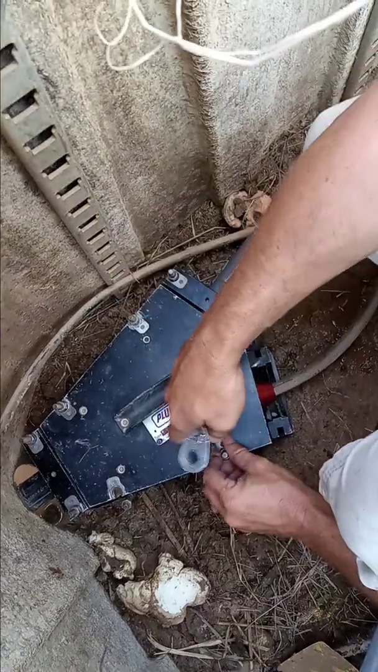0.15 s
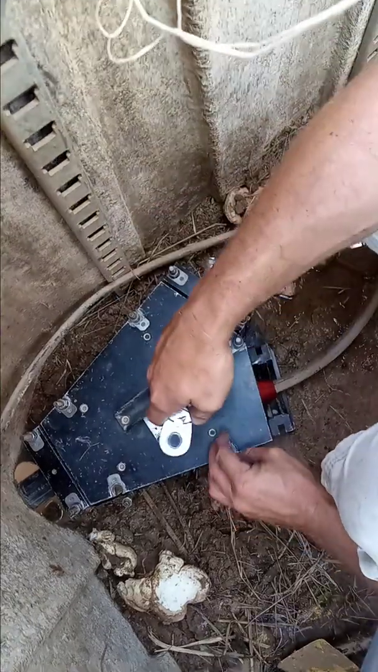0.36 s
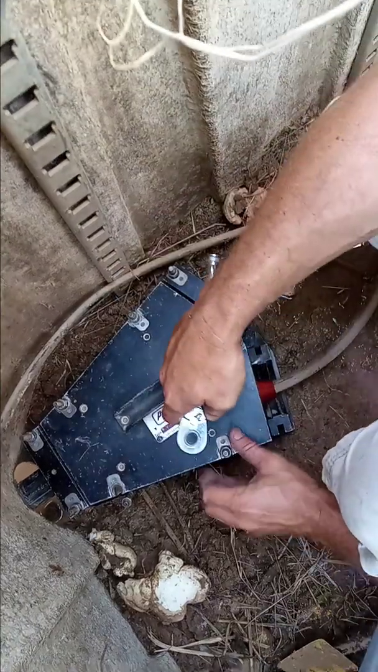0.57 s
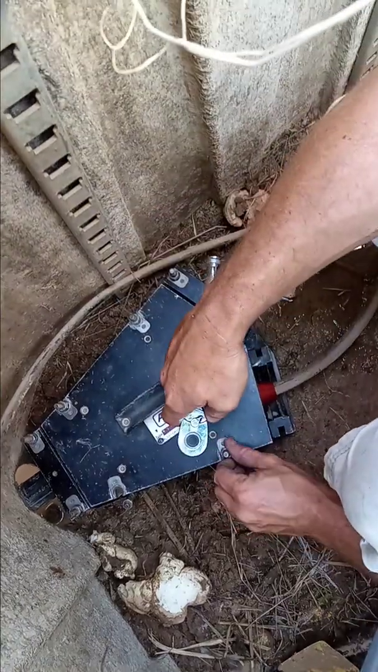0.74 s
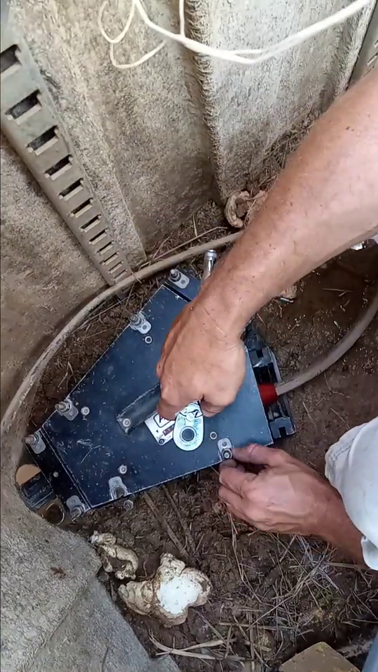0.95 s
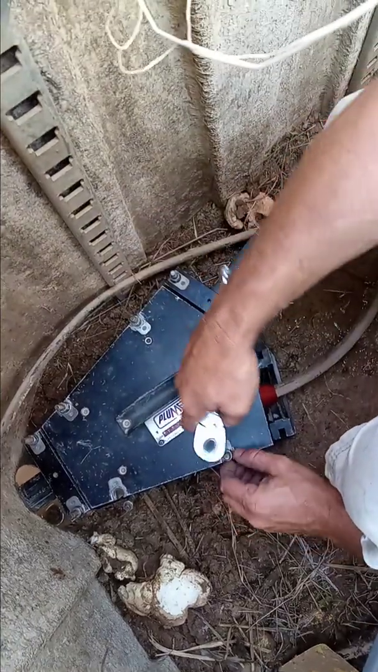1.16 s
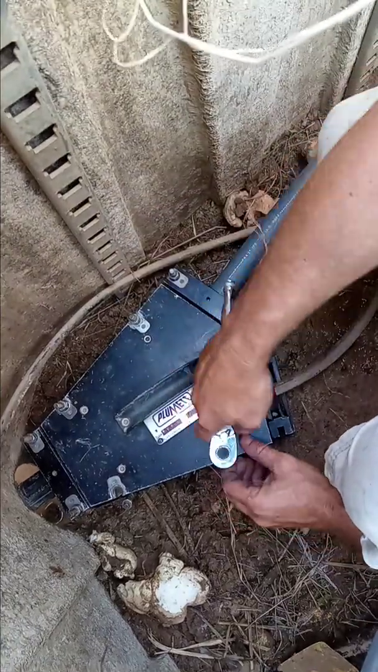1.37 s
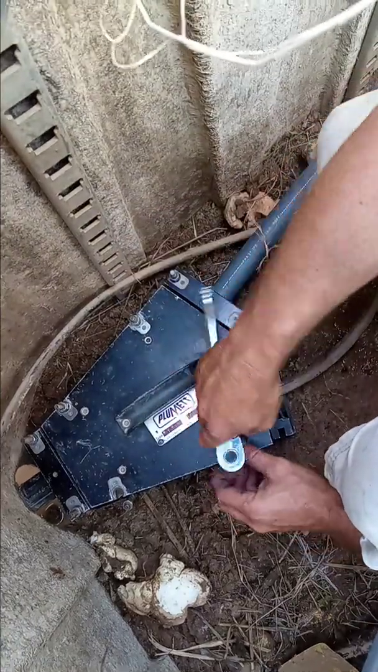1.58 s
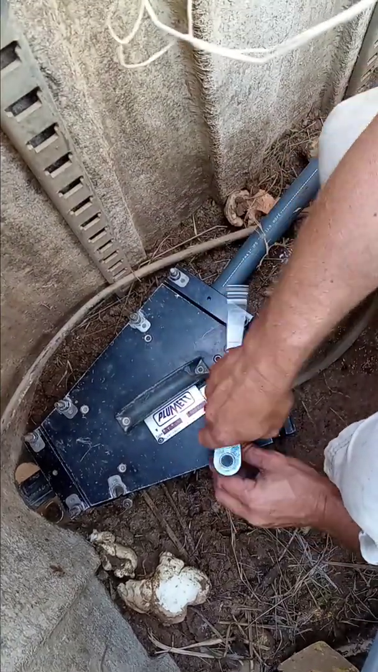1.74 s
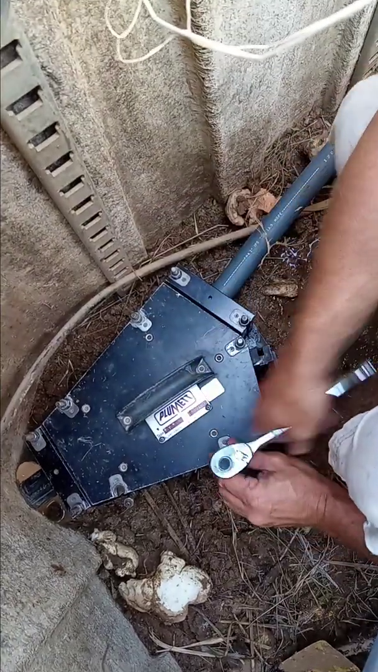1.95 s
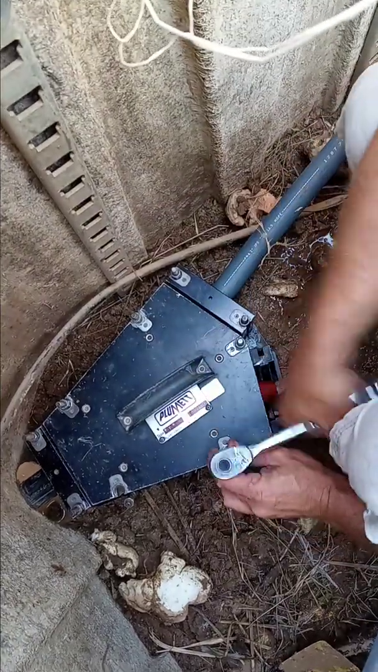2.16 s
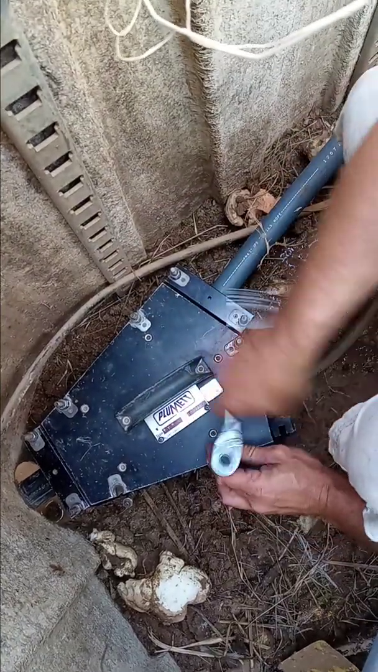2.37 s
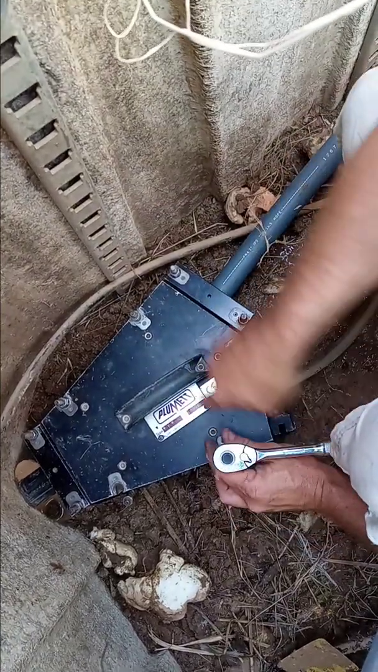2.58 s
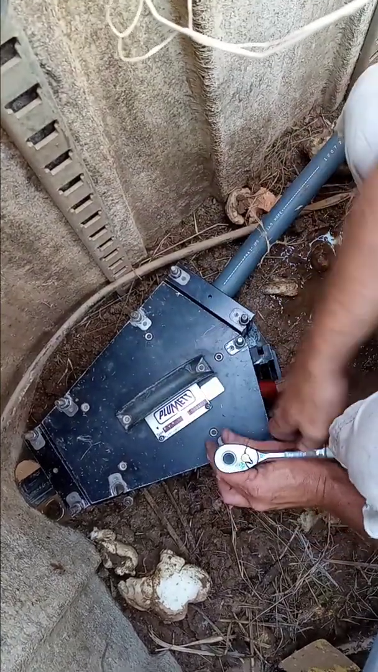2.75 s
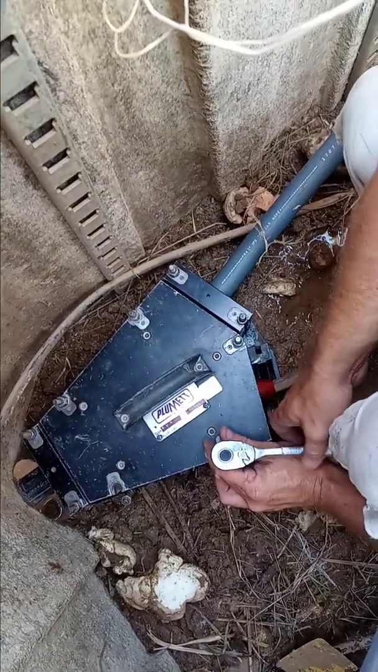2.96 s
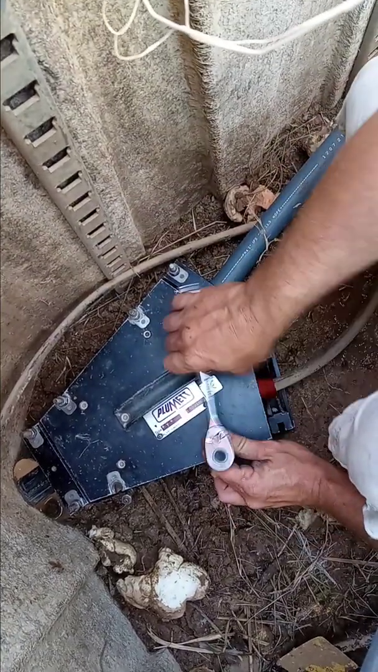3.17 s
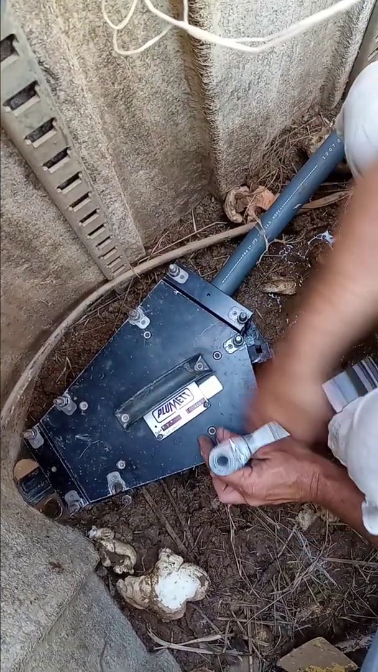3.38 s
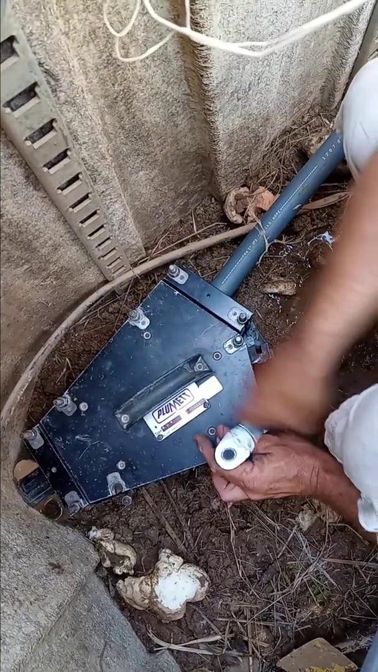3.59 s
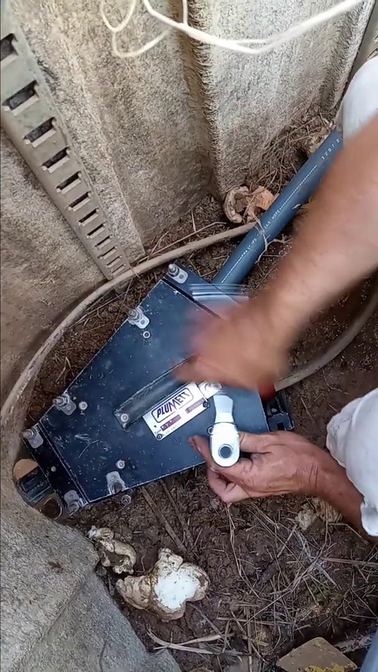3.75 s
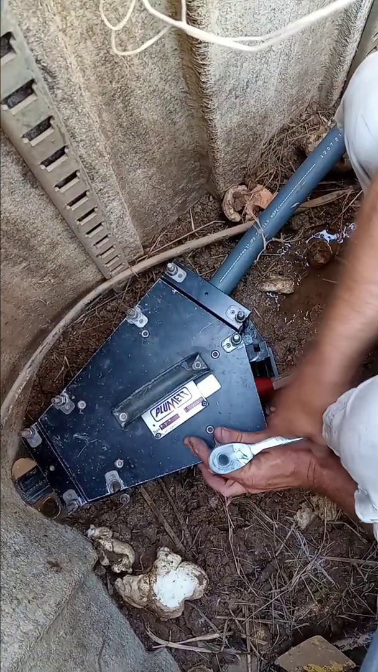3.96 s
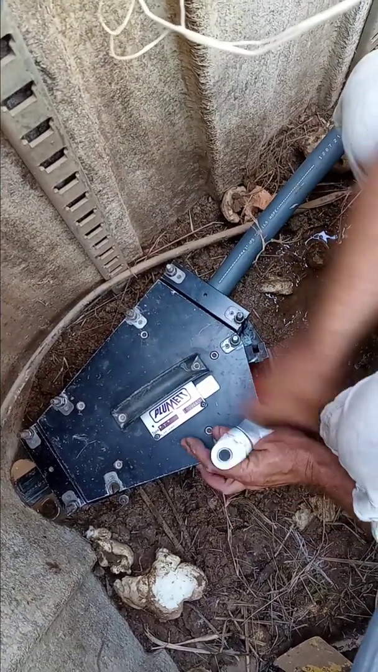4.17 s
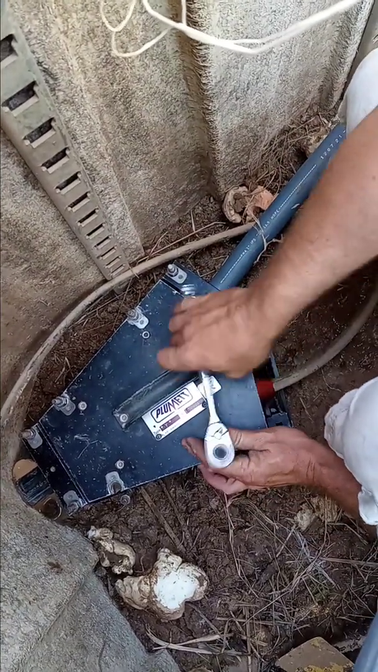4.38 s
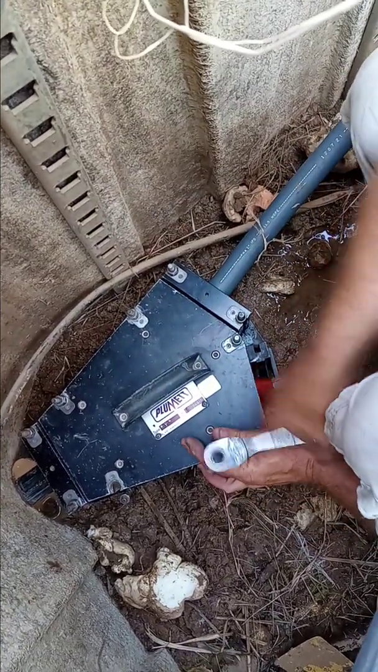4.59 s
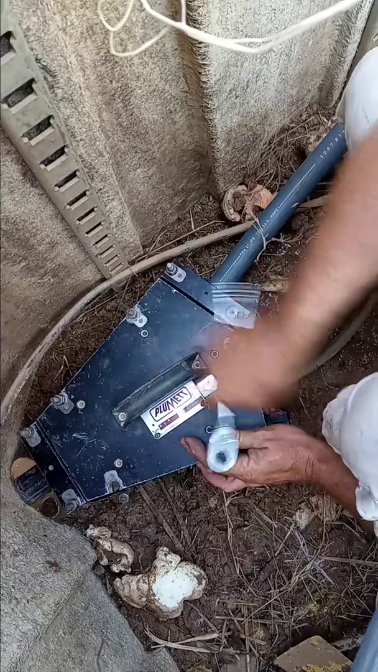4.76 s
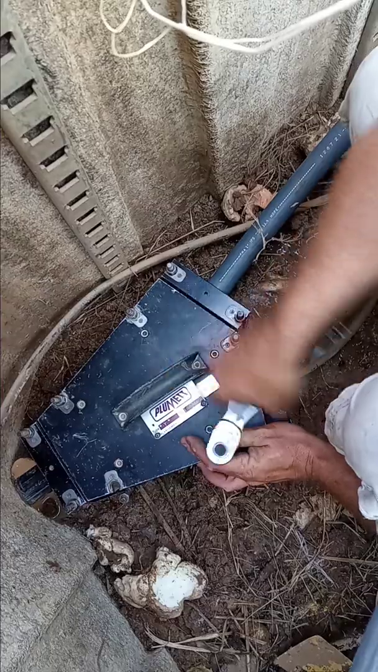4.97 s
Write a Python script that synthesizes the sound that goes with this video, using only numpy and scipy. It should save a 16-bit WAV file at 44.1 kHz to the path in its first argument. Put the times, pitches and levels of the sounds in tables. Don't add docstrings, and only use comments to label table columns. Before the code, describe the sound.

Close stereo sound of wrench work: fingers and thread rub quietly, a socket clunks onto a bolt, and a hollow box gives dull booms. The first ratchet purr comes around two seconds, another near three, then brisk repeated strokes, each a tight run of steel clicks between loose lid knocks and thin handle rings. Outdoor pit, weak hiss, low uneven engine idle far away; image leans left.

```python
import sys
import numpy as np
from scipy import signal
from scipy.fft import rfft, irfft
from scipy.io import wavfile
from scipy.ndimage import uniform_filter1d

SR = 44100
rng = np.random.default_rng(int(sys.argv[2]) if len(sys.argv) > 2 else 0)


def log_audio(samples):
    frames = np.atleast_2d(samples).T
    limited = np.clip(frames, -1, 1)
    pcm = np.round(limited * 32767).astype(np.int16)
    wavfile.write(sys.argv[1], SR, pcm)


def boost_factor(decibels):
    exponent = np.asarray(decibels, float) / 20
    return 10 ** exponent


N = 221508


def resonances(modes, hz):
    f, width, db = np.transpose(modes)[:, :, None]
    return boost_factor(db) * 1j * hz * width / (f ** 2 - hz ** 2 + 1j * hz * width)


def ring(x, modes, order=1):
    n = x.shape[-1]
    signs = (-1) ** np.arange(len(modes))
    response = signs @ resonances(modes, np.fft.rfftfreq(n, 1 / SR))
    y = irfft(rfft(x) * response ** order, n)
    return y / np.sqrt(np.mean(y ** 2))


def curve(table, column, off_db=-120):
    points = np.array(table)
    return np.interp(np.arange(N) / SR, points[:, 0], points[:, column], off_db, off_db)


def pair(shape, alike_hz):
    one, left, right = rfft(rng.standard_normal(shape + (3,)), axis=-2).T
    hz = np.fft.rfftfreq(shape[-1], 1 / SR).reshape((-1,) + (1,) * (len(shape) - 1))
    alike = 1 / (1 + (hz / alike_hz) ** 2)
    both = np.sqrt(alike) * one + np.sqrt(1 - alike) * np.array([left, right])
    return irfft(both, shape[-1], axis=1).T


# freq_hz, density_db_per_hz
AIR_SPECTRUM = [(59, -35), (100, -23), (109, -8), (210, -15), (558, -27.5), (621, -30), (1060, -36),
                (1650, -34), (2990, -39), (16000, -35.5)]
AIR_DB = -57.5


def air():
    hz = np.fft.rfftfreq(N, 1 / SR) + 1
    f, db = np.transpose(AIR_SPECTRUM)
    colour = boost_factor(np.interp(np.log(hz), np.log(f), db))
    hiss = irfft(rfft(pair((N,), alike_hz=450.).T) * colour, N)
    flutter = boost_factor(0.77 * ring(rng.standard_normal(N), [(2.6, 3, 0)]))
    return hiss * flutter * boost_factor(AIR_DB) / np.sqrt(np.mean(hiss ** 2))


# time_s, level_db
IDLE = [(0.0, -49.5), (1.3, -44.5), (1.9, -49), (2.3, -52.5), (2.6, -41.5), (3.1, -47.5), (3.5, -54.5),
        (5.02, -54.5)]
# peak_s, level_db, half_length_s
SWELLS = [(0.047, -48, .04), (0.3, -42.5, 0.17), (0.69, -44, .06), (0.848, -41.5, 0.062),
          (0.993, -43.5, 0.077), (1.151, -43.5, 0.11), (1.55, -40, .12), (2.09, -46, .12),
          (2.453, -33.5, 0.16), (2.79, -47, .1), (3.18, -35.5, 0.068), (3.309, -36.5, .05),
          (3.382, -33.5, 0.053), (3.636, -40, .07), (3.792, -36, 0.053), (4.062, -43, 0.05),
          (4.2, -43, .08), (4.539, -33, .1), (4.791, -42.5, 0.076), (4.898, -45.5, .08)]


def idle_level():
    t = np.arange(N) / SR
    level = boost_factor(curve(IDLE, 1))
    for peak_s, db, half_s in SWELLS:
        level = level + boost_factor(db) * np.cos(np.pi / 2 * np.clip((t - peak_s) / half_s, -1, 1)) ** 2
    return level


# freq_hz, level_db
IDLE_TONES = [(64.6, 0.5), (80.0, -4.5)]
# freq_hz, width_hz, level_db
EXHAUST = [(62, 24, 6.5), (157, 29, -3.5), (222, 160, -12)]


def engine():
    out = boost_factor(-7.0) * ring(pair((N,), alike_hz=300.).T, EXHAUST, order=2)
    for hz, db in IDLE_TONES:
        drift, swell = (ring(rng.standard_normal(N), [(3.0, 5.6, 0)]) for _ in range(2))
        phase = 2 * np.pi * np.cumsum(hz * (1 + 0.015 * drift)) / SR
        out = out + boost_factor(db + 3.03 * swell) * np.sin(phase)
    return out * idle_level() * boost_factor(-2.0)


# time_s, pitch_hz, level_db
BOOMS = [
    [(1.36, 355, -45.5), (1.436, 331, -47), (1.47, 306, -75)],
    [(1.87, 324, -43), (1.932, 314, -44.5), (1.98, 267, -54)],
    [(2.5, 328, -41), (2.582, 228.3, -44.5), (2.62, 214, -72)],
    [(4.45, 208.2, -38), (4.538, 250, -32), (4.58, 225, -56)],
]


def bump():
    wobble = 0.88 + 0.76 * ring(rng.standard_normal(N), [(40, 54, 0)])
    out = 0
    for boom in BOOMS:
        level = uniform_filter1d(boost_factor(curve(boom, 2) - 3.5), size=300)
        phase = 2 * np.pi * np.cumsum(curve(boom, 1, 200)) / SR
        out = out + np.sqrt(2) * level * wobble * np.sin(phase)
    return out


# time_s, level_db, box_share_db
RUBS = [
    [(0.0, -49.5, -8.5), (0.18, -62, -11)],
    [(0.12, -59.5, -17), (0.508, -55, -16), (0.63, -62.5, -21), (0.72, -103, 1)],
    [(1.78, -81.5, 26), (1.852, -59, -28), (2.12, -44, -0.5)],
    [(2.28, -50.5, -4), (2.394, -50.5, 5.5), (2.654, -65, -19), (2.8, -87.5, 19)],
    [(3.15, -71, 26.5), (3.216, -52, -2), (3.426, -54.5, 14), (3.696, -50.5, 3), (4.06, -46.5, 0),
     (4.17, -51.5, 7), (4.29, -54, 8.5), (4.764, -50, 2), (5.02, -47.5, 2)],
]
# freq_hz, width_hz, level_db
RUB_SQUEAKS = [
    [(2085, 50, -7), (2390, 130, -7), (2690, 47, 2), (3600, 340, 0), (3910, 470, -2), (6400, 490, -16)],
    [(2300, 1800, -5), (3500, 270, -1), (3780, 470, -0.5), (4370, 350, -1), (5320, 150, -13),
     (6200, 1300, -8.5)],
    [(1940, 340, -1), (2310, 210, -1), (2860, 340, -5), (5090, 230, -4.5), (7350, 600, -12)],
    [(2200, 3100, 5.5), (3720, 1200, 8.5), (4780, 250, 2), (5760, 1500, -16.5)],
    [(2360, 2660, 4.5), (3990, 210, -1), (5540, 850, -2.5), (6400, 330, -39)],
]


def rubbing():
    out = np.zeros((2, N))
    for table, squeak in zip(RUBS, RUB_SQUEAKS):
        a, b = int(table[0][0] * SR), min(int(table[-1][0] * SR), N)
        slip_db = 1.5 * np.repeat(rng.standard_normal(N // 64 + 1), 64)[:b - a]
        slips = pair((b - a,), alike_hz=1500.).T * boost_factor(slip_db)
        voices = 0
        for mode in squeak:
            waver_db = 2.5 * ring(rng.standard_normal(b - a), [(5, 12, 0)])
            voices = voices + boost_factor(mode[2] + waver_db) * ring(slips, [mode], order=2)
        box = boost_factor(curve(table, 2)[a:b]) * ring(slips, BOX)
        out[:, a:b] += boost_factor(curve(table, 1)[a:b]) * (voices / 1.27 + box)
    return out


# freq_hz, width_hz, level_db
BOX = [(302.6, 19, -11.5), (503, 40, 7.5), (814, 128, 0), (951, 114, 0), (1151, 307, -4)]
LID = [(1640, 640, -15.5), (1920, 205, -7), (2290, 186, -1), (2920, 1190, -10.5), (3556, 405, 3),
       (3660, 106, 5), (4460, 1590, -3.5), (2503, 1280, -5)]
STEEL = [(5540, 2200, -5), (6807, 110, 4.5), (6850, 390, 1), (8350, 3160, -1.5), (9090, 410, 4),
         (10460, 2300, -0.5), (13270, 5000, -3), (15160, 430, 0.5)]
HANDLE = [(3780, 55, 0), (6990, 55, -1)]
HIT = 4096
ECHO_S = .0032


def hits(s, shares_db, t60, snap_db, snap_t60, scatter_db, lid_hz=2800., focus_db=0., blunt_db=-6.0,
         damping=0.73, attack_s=0.00035, tick_db=10.5):
    t = np.arange(HIT)[:, None] / SR
    snap = boost_factor(snap_db - 60 * t / snap_t60)
    echo = boost_factor(-9.0) * np.roll(snap, int(ECHO_S * SR))
    rattle = boost_factor(-60 * t / np.reshape(t60, (-1, 1, 1)))
    shape = np.minimum(t / attack_s, 1) * (snap + echo + rattle)
    tail = pair((len(s), HIT), alike_hz=1790.0) * shape
    tail[:, 8] += boost_factor(snap_db + tick_db)
    luck_db = scatter_db * rng.standard_normal((len(s), 40))
    hz = np.fft.rfftfreq(HIT, 1 / SR)
    colour = 0
    for k, (modes, db) in enumerate(zip([BOX, LID, STEEL, HANDLE], shares_db)):
        f = np.array(modes)[:, 0]
        weight_db = luck_db[:, 10 * k:10 * k + len(modes)]
        if modes is LID:
            weight_db = weight_db - focus_db * np.log2(f / np.reshape(lid_hz, (-1, 1))) ** 2
        if modes is STEEL:
            tilt_db = .5 * np.minimum(db - shares_db[1], 0)[:, None] - blunt_db
            weight_db = weight_db + tilt_db * np.log2(f / f[0])
        weights = boost_factor(weight_db) * (-1) ** np.arange(len(modes))
        part = weights @ resonances(np.multiply(modes, [1, damping, 1]), hz)
        part_rms = np.sqrt(np.mean(abs(part) ** 2, axis=1, keepdims=True))
        colour = colour + part * boost_factor(db)[:, None] / part_rms
    sound = irfft(rfft(tail, axis=1) * colour[:, :, None], HIT, axis=1)
    out = np.zeros((N + HIT, 2))
    for start, blow in zip((s * SR).astype(int), sound):
        out[start:start + HIT] += blow
    return out[:N].T


# start_s, blow_db, box_db, steel_db
KNOCKS = [(0.0469, -44, -8, -11), (0.0962, -39.5, -15, -5.5), (0.118, -45, -4, -7), (0.182, -52, -18, -6),
          (0.431, -24, 3, -5.5), (0.6333, -22.5, -5, -35), (0.7824, -50, -2, -34),
          (1.2027, -16.5, -24, -19.5), (1.2318, -22, -7.5, -14), (1.2855, -16.5, -7, -11.5),
          (1.3577, -28, 7.5, -13), (1.4015, -46, 6, -9), (1.5001, -36, -20, -40), (1.6942, -47, 2.5, -5),
          (1.719, -31, -5, -12.5), (1.8658, -9, -7, -20), (1.9734, -44.5, 7, -28),
          (2.3371, -27.5, -1.5, -12.5), (2.362, -21.5, 2, -18), (2.4901, -21.5, -9.5, -9.5),
          (2.502, -25, 5.5, -28),
          (3.2233, -30.5, 8, -21), (3.249, -13, -7.5, -5), (3.3071, -19.5, -1, -1.5),
           (3.344, -29, 8.5, -8), (3.5053, -10.5, -11, -17.5), (3.5377, -29.5, 2.5, -5),
           (3.566, -16, -4, -2.5), (3.6058, -17, -1, -2), (3.652, -18.5, 1.5, -8), (3.7907, -20.5, 2, -22),
           (3.8265, -32.5, 2.5, -7.5), (3.8577, -18.5, 0, 1.5), (3.9154, -21.5, -20, -1),
           (3.954, -25, -5, 5.5), (4.102, -31, 7.5, -18), (4.1163, -19.5, -8, 0), (4.15, -17.5, 0.5, -4),
           (4.1566, -15.5, -8, 0), (4.2034, -23.5, -8, 4), (4.2519, -24.5, -5, -2),
           (4.4423, -21.5, -18, -11.5), (4.458, -12.5, -12, -0.5), (4.5029, -30, 5.5, -3),
           (4.56, -25.5, -1.5, 6.5), (4.575, -29.5, 6.5, -32), (4.695, -16.5, -10, -28.5),
           (4.746, -33.5, -0.5, -19), (4.7695, -13.5, -13.5, -3), (4.8119, -29.5, -0.5, -0.5),
           (4.8905, -19.5, -3.5, -29)]
SHARP_LID_HZ, OCTAVES_PER_DB = 2960, .014
HARD_T60_S, RATTLE_S_PER_DB = 0.052, 0.0027


def knocks():
    s, db, box_db, steel_db = np.transpose(KNOCKS)
    shares_db = [db + box_db - 6, db - 5.0, db + steel_db - 4.0]
    lid_hz = SHARP_LID_HZ * 2 ** (OCTAVES_PER_DB * np.minimum(steel_db, 0))
    t60 = HARD_T60_S + RATTLE_S_PER_DB * (db.max() - db)
    return hits(s, shares_db, t60, snap_db=-3.5, snap_t60=0.0055, scatter_db=4.5, lid_hz=lid_hz,
                focus_db=12.0, blunt_db=9.5, damping=1.26, attack_s=0.0011, tick_db=0.5)


# start_s, low_note_db, high_note_db
PINGS = [
    (3.181, -33, -53),
    (3.352, -58, -34.5),
    (3.953, -33, -47),
    (4.253, -33, -42),
    (4.556, -27, -44),
    (4.72, -59, -58),
]


def pings():
    out, t = 0, np.arange(N) / SR
    for k, (hz, width, db) in enumerate(HANDLE):
        level = sum(boost_factor(row[1 + k] - 60 * abs(t - row[0]) / 0.15) * (t > row[0]) for row in PINGS)
        out = out + level * ring(pair((N,), alike_hz=3000.).T, [(hz, 0.79 * width, db)])
    return out


# first_tooth_s, length_s, teeth, first_phase_0_1, last_phase_0_1
SWINGS = [(2.0969, 0.2053, 19, 0.0, 0.99), (2.9798, 0.1744, 20, 0.15, 0.9),
          (3.3709, 0.1106, 14, 0.09, 0.79), (3.6832, 0.0797, 13, 0.12, 0.9),
          (3.9824, 0.0879, 15, 0.19, 0.89), (4.2836, 0.0871, 15, 0.24, 0.88),
          (4.5996, 0.0785, 13, 0.27, 0.79), (4.9047, 0.0898, 20, 0.11, 0.91)]
TOOTH_DB, SPEED_DB = -19.5, 2
FIRST_TOOTH_DB, TOOTH_SCATTER_DB = 3.0, 1.82
TOOTH_JITTER = .15
BOUNCE_S, BOUNCE_DB = .0042, -7.5


def teeth():
    rows = []
    for (start, length, count, first, last), stroke in zip(SWINGS, STROKES):
        angle = np.linspace(np.cos(np.pi * first), np.cos(np.pi * last), count)
        part = np.arccos(angle) / np.pi
        speed, luck = np.sin(np.pi * part), rng.standard_normal((count, 3))
        jitter = TOOTH_JITTER * speed ** 2 * luck[:, 0] / count
        s = start + length * ((part - first) / (last - first) + jitter)
        db = TOOTH_DB + SPEED_DB * speed + TOOTH_SCATTER_DB * luck[:, 1]
        db = db + FIRST_TOOTH_DB * (part == part[0]) + stroke[4] * (part - .5)
        bounce_db = db + BOUNCE_DB - 13.0 * (1 - speed) + 2 * TOOTH_SCATTER_DB * luck[:, 2]
        rows += [(s, db), (s + BOUNCE_S, bounce_db)]
    return np.hstack(rows)


# start_s, grip_db, lid_share_db, box_share_db, first_to_last_tooth_db
STROKES = [(2.0, 2, -17, -25.5, 3.5), (2.9, 0.5, -14, -26.5, 3), (3.3, 0.5, -10.5, -29, 1),
           (3.6, 3, -12.5, -22, 2), (3.9, 0.5, -10, -25.5, -0.5), (4.2, 1, -11, -20.5, 3),
           (4.5, 0.5, -11.5, -26.5, -0.5), (4.85, 1, -13, -31, 0)]


def ratchet():
    s, db = teeth()
    start, grip_db, lid_db, box_db, _ = np.transpose(STROKES)
    stroke = np.searchsorted(start, s) - 1
    db = db + grip_db[stroke]
    shares_db = [db + box_db[stroke] - 7, db + lid_db[stroke] - 7.5, db - 8.5, db - 22.5]
    return hits(s - .0004, shares_db, np.full(len(s), .055), snap_db=11.0, snap_t60=.011, scatter_db=3.5)


def scene():
    return air() + engine() + bump() + rubbing() + knocks() + pings() + ratchet()


def top_cut(x):
    return signal.sosfilt(signal.butter(12, 17110, fs=SR, output="sos"), x)


# freq_hz, left_db, right_db
PORTS = [(60.5, 3.5, -5.5), (540, 8.5, -0.5), (1090, 3, -0.5), (1650, 8.5, -7), (3150, 3, -11),
         (5200, -0.5, -8.5), (6600, 4, -3.5), (7320, 0.5, -10), (9100, -8.5, -5.5), (9470, -16.5, -1),
         (11450, -32.5, -12.5), (12450, -43, -24.5), (14700, -24, -8.5), (15600, -19, -5),
         (16100, -59, -49)]
LEFT_LAG = 42
HEADROOM = .62


def record(dry):
    hz = np.fft.rfftfreq(N, 1 / SR) + 1
    f, *ports_db = np.transpose(PORTS)
    gain = boost_factor([np.interp(np.log(hz), np.log(f), port_db) for port_db in ports_db])
    left, right = irfft(rfft(dry) * gain, N)
    both = np.array([np.roll(left, LEFT_LAG), right])
    mix = HEADROOM * np.tanh(both / HEADROOM)
    return top_cut(mix)


dry = scene()
out = record(dry)
log_audio(out)
```